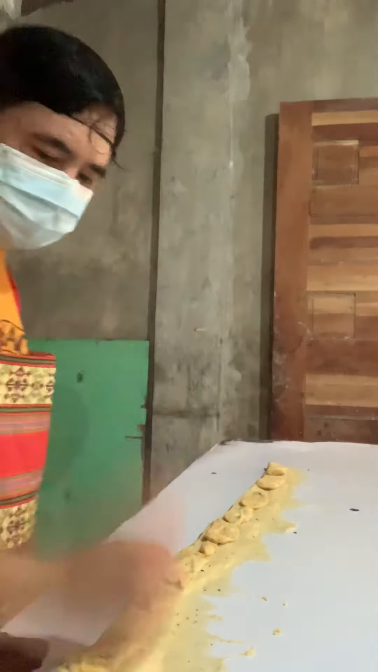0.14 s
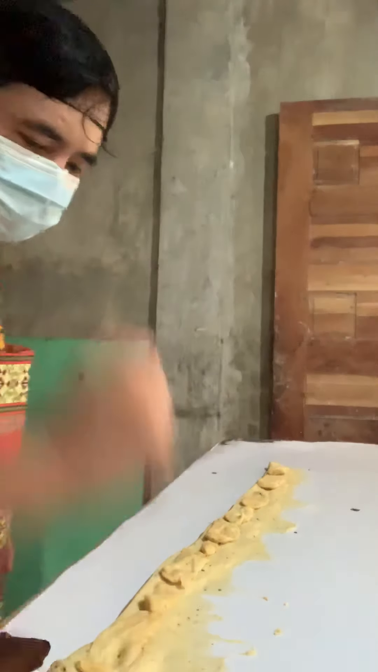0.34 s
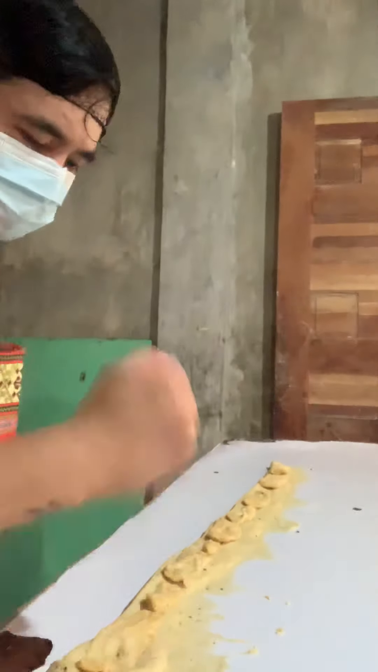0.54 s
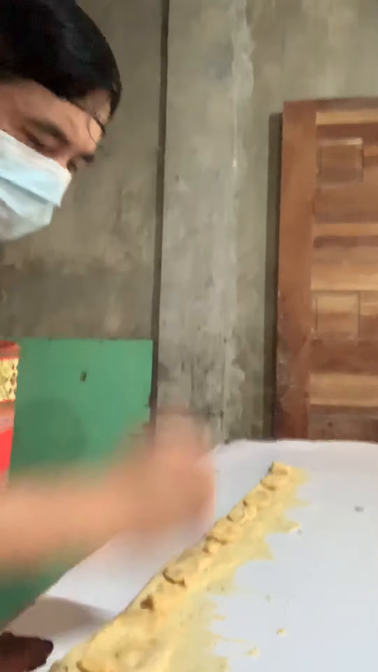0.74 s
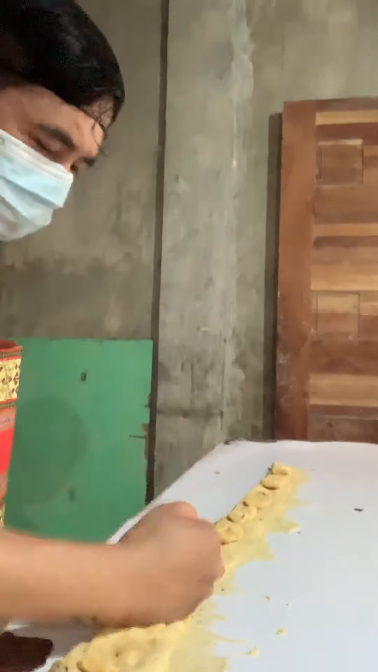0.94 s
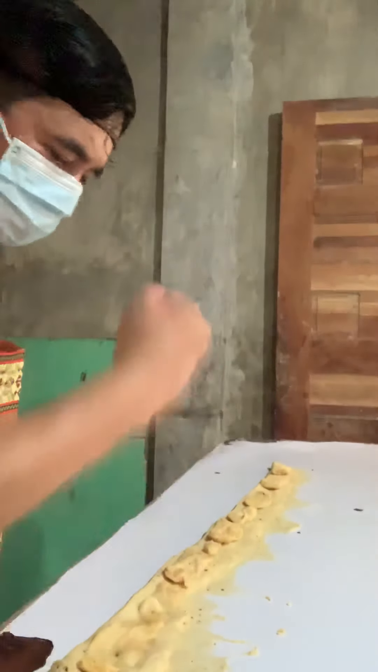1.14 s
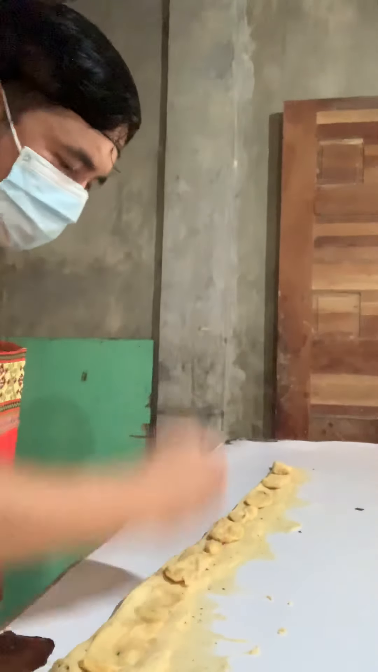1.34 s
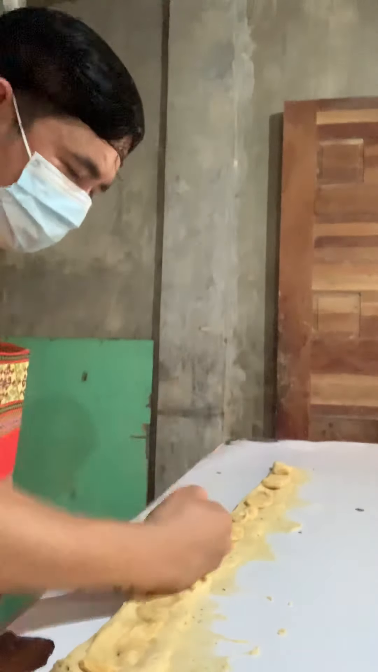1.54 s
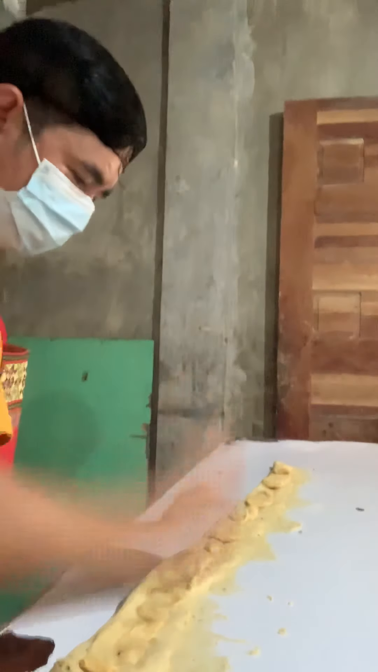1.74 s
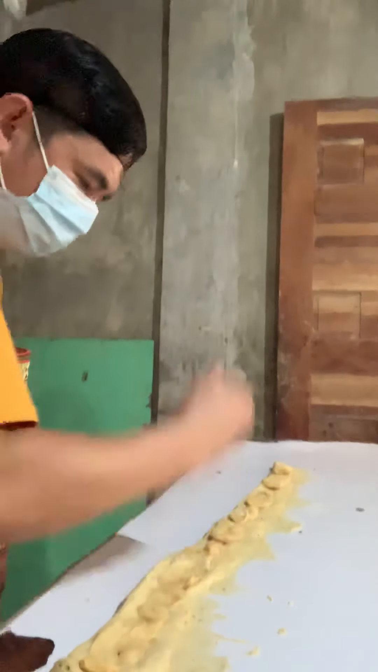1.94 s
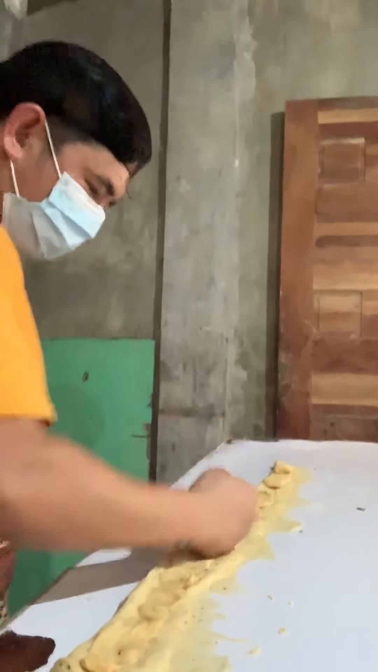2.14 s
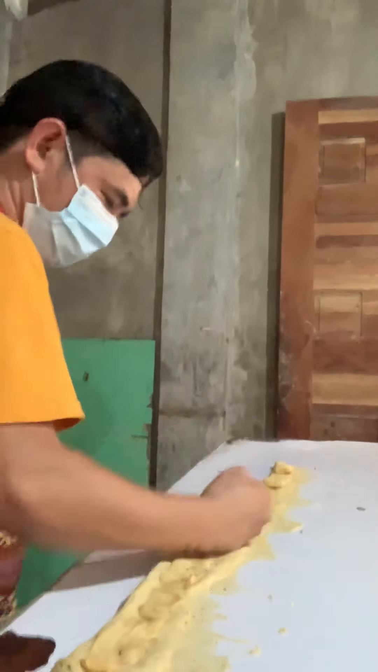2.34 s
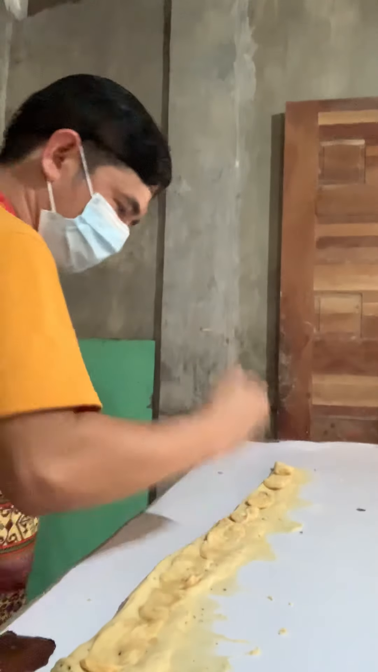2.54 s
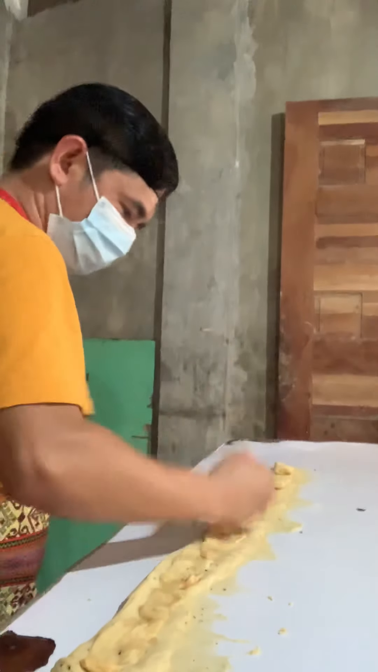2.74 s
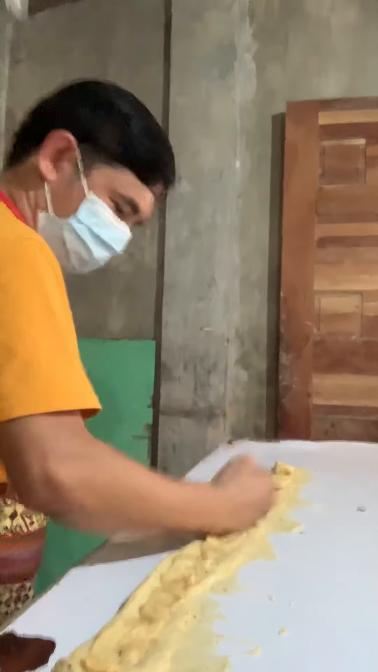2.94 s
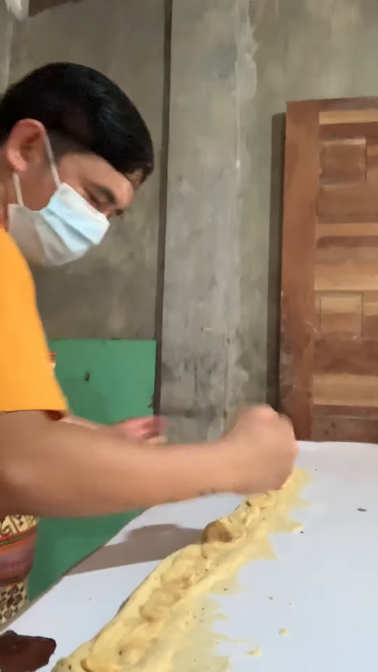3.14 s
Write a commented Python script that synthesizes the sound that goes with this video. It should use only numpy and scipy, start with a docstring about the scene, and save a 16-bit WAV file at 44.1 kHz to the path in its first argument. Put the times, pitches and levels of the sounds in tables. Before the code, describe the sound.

Rapid heavy thumps of a fist into dough, table top booming and chattering in a bare room

```python
"""First comes a faint steady hiss and the fading tail of a swish, with more swishes in the first half. Then a
fist pounds dough on a large sheet-covered table, close to a phone in a bare concrete room. Each blow is a short
low wave for the flexing table top, with decaying sines as its frame rumbles. Bursts of noise make smacks on the
dough, tiny impacts make the loose sheet chatter, single rings make knocks. Random taps that die away make the
room; two microphone ports pick everything up."""
import sys
import numpy as np
from scipy import signal
from scipy.fft import rfft, irfft, next_fast_len
from scipy.io import wavfile
from scipy.ndimage import uniform_filter1d

SR = 44100
rng = np.random.default_rng(int(sys.argv[2]) if len(sys.argv) > 2 else 0)


def put_to_file(sound):
    """Save the sound as 16-bit audio at rate SR, in the file named by the first command-line argument."""
    columns = np.atleast_2d(sound).T  # one column per channel
    safe = np.clip(columns, -1, 1)
    whole_steps = np.round(safe * 32767)
    wavfile.write(sys.argv[1], SR, whole_steps.astype(np.int16))


N = 145530  # samples, 3.3 s


def amp(db):
    """Turns dB into a plain multiplier."""
    return 10 ** (np.asarray(db) / 20)


def even(x):
    """Scales a sound to an average (RMS) level of 1."""
    return x / np.sqrt(np.mean(x ** 2) + 1e-20)


def read(points, hz):
    """Reads a curve between its points, along a logarithmic pitch scale."""
    f, v = np.transpose(points)
    return np.interp(np.log(hz + 1), np.log(f + 1), v)


def colour(x, points):
    """Makes each pitch louder or softer by a curve of (f/Hz, level/dB)."""
    n = next_fast_len(x.shape[-1] + 2048)
    gain = amp(read(points, np.fft.rfftfreq(n, 1 / SR)))
    return irfft(rfft(x, n) * gain, n)[..., :x.shape[-1]]


def add(mix, s, sound):
    """Adds a sound into the mix from time s, in seconds."""
    part = mix[..., round(s * SR):][..., :sound.shape[-1]]
    part += sound[..., :part.shape[-1]]


def ring(modes, length, turn):
    """Adds up fading sines, as a struck body rings; each starts at its own phase in turns."""
    t = np.arange(0, length, 1 / SR)
    out = 0
    for (hz, db, t60), start in zip(modes, turn):
        out = out + amp(db - 60 * t / t60) * np.sin(2 * np.pi * (hz * t + start))
    return out


HUSH_HZ = 15800  # hiss drops away sharply above this


def hiss(points):
    """Makes two unrelated noises of one colour, together at an RMS level of 1."""
    top_end = [(HUSH_HZ, points[-1][1] - 3), (HUSH_HZ + 200, -90)]
    return even(colour(rng.standard_normal((2, N)), points + top_end))


# colour of the steady background hiss: f/Hz, level/dB
AIR_COLOUR = [(25, -5), (80, 2.5), (250, -7), (600, -12), (1500, -17.5), (7000, -34.5), (12000, -37.5)]
AIR_DB = -36.5


def air():
    """A steady hiss, unrelated in its two channels, lies under everything."""
    return amp(AIR_DB) * hiss(AIR_COLOUR)


# swishes: start t/s, level/dB, low body level/dB, hold length/s
SWISH_TIMES = [(-.2, -29, -26.5, 0.041), (0.049, -33, -44, 0.032), (0.335, -31, -33, 0.027),
               (0.615, -32.5, -37.5, 0.023), (0.906, -33.5, -37.5, 0.046), (1.171, -34.5, -35, 0.098),
               (1.473, -29.5, -30.5, 0.019), (1.789, -32.5, -37.5, 0.01)]
# colour of the swish hiss: f/Hz, level/dB
SWISH_COLOUR = [(700, -13), (1500, 1.5), (3000, -4), (6000, -8.5), (12000, -13.5)]
SWISH_RISE_S, SWISH_T60 = 0.021, 0.77  # swell; seconds for the basic shape to fall 60 dB
TREBLE_FADE = 0.28  # the treble falls this much faster, as a fraction
SWISH_PATCH_DB = 3  # typical size of the patches


def swishes():
    """Patchy hiss swells, holds and fades; treble dies first, a low body fades at half the dB rate."""
    level, top, low = np.zeros((3, N))
    for s, db, body_db, length in SWISH_TIMES:
        t = np.maximum(np.arange(N) / SR - s, 0)
        swell = np.sin(np.pi / 2 * np.minimum(t / SWISH_RISE_S, 1)) ** 2
        shape = swell * amp(-60 * np.maximum(t - length, 0) / SWISH_T60)
        level += amp(db) * shape
        top += amp(db) * shape ** (1 + TREBLE_FADE)
        low += amp(body_db) * np.sqrt(shape)
    # smoothed random levels make patches in pitch and time
    z = signal.stft(hiss(SWISH_COLOUR))[2]
    patches = uniform_filter1d(rng.standard_normal(z.shape[1:]), size=12, axis=0)
    patches = even(uniform_filter1d(patches, size=8, axis=1))
    z = z * amp(SWISH_PATCH_DB * patches)
    under = np.arange(z.shape[1])[:, None] < 50  # below about 8.6 kHz
    dull, bright = (signal.istft(z * half)[1][:, :N] for half in (under, ~under))
    flutter = amp(2.7 * even(uniform_filter1d(rng.standard_normal(N), 500)))
    body = hiss([(150, -35), (400, -5.5), (750, -11), (1200, -15.5), (3000, -52)])
    return level * dull + top * bright + flutter * low * body


# blows, played by thumps and chatter:
# deepest flex t/s, thump level/dB, chatter level/dB, chatter length/s
BLOW_TIMES = [(0.216, -4, -15, 0.049), (0.4604, -2, -11.5, 0.045), (0.689, -2.5, -11.5, 0.055),
              (0.9653, -1.5, -12.5, 0.061), (1.2797, -1, -14.5, 0.068), (1.5678, -1.5, -15, 0.045),
              (1.8254, -5, -12.5, 0.043), (2.1255, -3, -13.5, 0.053), (2.399, -4, -12.5, 0.046),
              (2.669, -4, -15, 0.042), (2.968, -5, -14, 0.03)]
# ringing tones of the table frame: f/Hz, level/dB, time to fall 60 dB/s
FRAME_TONES = [(32.34, 3, 0.54), (60.6, -10, 0.44), (82.2, -0.5, 0.35), (123.8, -7.5, 0.41),
               (174.8, -4, 0.23)]
FLEX_HZ = 84.7
FLEX_WIDTH, FLEX_SKEW = 0.62, .12  # envelope width in cycles; lean towards the rebound in cycles
FLEX_SQUARE_PER_S = 0.11  # third harmonic steepens the flex more as the fist moves along the table
RUMBLE_DB = -15  # next to the thump


def thumps():
    """The table top bulges up, down and up again, then its frame rumbles on."""
    out, t = np.zeros(N), np.arange(-.03, .03, 1 / SR)
    turns = .5 + 0.23 * rng.standard_normal((len(BLOW_TIMES), len(FRAME_TONES)))
    envelope = np.exp(-((t * FLEX_HZ - FLEX_SKEW) / FLEX_WIDTH) ** 2)
    for (s, db, _, _), turn in zip(BLOW_TIMES, turns):
        third = FLEX_SQUARE_PER_S * s * np.cos(6 * np.pi * FLEX_HZ * t)
        flex = -(np.cos(2 * np.pi * FLEX_HZ * t) - third) * envelope
        add(out, s - .03, amp(db) * flex)
        rumble = ring(FRAME_TONES, .9, turn)
        rise = np.minimum(np.arange(len(rumble)) / (0.0029 * SR), 1)
        add(out, s, amp(db + RUMBLE_DB) * rumble * rise)
    return out


# smacks of skin on dough: t/s, level/dB, treble at 12 kHz/dB
SMACK_TIMES = [(0.2037, -14.5, 6.5), (0.4491, -1.5, 2), (0.719, -22, -29), (0.9943, -14.5, -29),
               (1.27, -13.5, 9), (1.3111, -21.5, -9.5), (1.556, -22, 7), (1.5682, -7.5, -9),
               (1.8095, -10, -21), (2.1144, -11, -1), (2.399, -12, -4.5), (2.6538, -13, -1.5),
               (2.953, -18.5, 9.5)]
SMACK_S = 0.00034  # time to the peak


def smacks():
    """Knuckles on dough crack: noise that peaks at once and dies, each with its own treble."""
    out, u = np.zeros((2, N)), np.arange(800) / SR / SMACK_S
    burst = u * np.exp(1 - u)
    noises = rng.standard_normal((len(SMACK_TIMES), 2, 800))
    for (s, db, bright_db), noise in zip(SMACK_TIMES, noises):
        tint = [(600, -3.5), (2000, 2.5), (5500, 4.0), (12000, bright_db), (16500, bright_db - 21)]
        # mostly shared by both ports, a little diffuse
        add(out, s, amp(db) * colour(noise * [[1], [.3]] * burst, tint))
    return out


# ringing tones of the loose sheet: f/Hz, level/dB, time to fall 60 dB/s
SHEET_TONES = [(216, -7, 0.016), (337, -3, 0.016), (524, 3.5, 0.015), (705, -5, 0.034), (837.6, 1.5, 0.024),
               (995, -5, 0.034), (1166, -27.5, 0.029)]
CHATTER_PER_S, CHATTER_SPREAD_DB = 700, 2  # impacts a second; dB for each unit of a random draw
CHATTER_T60, CHATTER_SAG_DB = 0.1, 0.5  # seconds to fall 60 dB once it ends; slow drop before that
# the chatter dips while the fist rests in the dough: delay after deepest flex, width, depth
LULL_S, LULL_WIDTH_S, LULL_DB = 0.012, 0.0061, -2.5
CHATTER_FIZZ_DB, FIZZ_T60 = -16, 0.77  # next to the chatter; seconds to fall 60 dB


def chatter():
    """Many small impacts after each blow ring the loose sheet; a fizz of noise dies away in the room."""
    level, fizz, t = np.zeros(N), np.zeros(N), np.arange(0, .4, 1 / SR)
    rise = np.minimum(t / 0.006, 1)
    lull = LULL_DB * np.exp(-((t - .01 - LULL_S) / LULL_WIDTH_S) ** 2)
    for s, _, db, length in BLOW_TIMES:
        fall = 60 * np.maximum(t - length, 0) / CHATTER_T60
        sag = CHATTER_SAG_DB * np.minimum(t / length, 1)
        add(level, s - .01, rise * amp(db - fall - sag + lull))
        add(fizz, s - .012, rise * amp(db + CHATTER_FIZZ_DB - 60 * t / FIZZ_T60))
    size = amp(CHATTER_SPREAD_DB * np.minimum(rng.exponential(1, N), 4))
    impacts = size * (rng.random(N) < CHATTER_PER_S / SR)
    # each impact rings one tone of the sheet, picked at random
    spot, soft = rng.integers(0, len(SHEET_TONES), N), np.hanning(30)
    body = np.zeros(N)
    for k, tone in enumerate(SHEET_TONES):
        strike = np.convolve(ring([tone], .08, [0]), soft)
        body += signal.oaconvolve(impacts * (spot == k), strike)[:N]
    return level * even(body), fizz * hiss([(1200, -1), (4000, -12), (12000, -23)])


# knocks of the loose sheet bouncing on the table: t/s, level/dB, f/Hz
KNOCK_TIMES = [(0.214, -9, 553), (0.244, -9, 842), (.342, -18.5, 721), (0.369, -18.5, 680),
               (0.477, -6.5, 632), (0.49, -6, 507), (0.687, -16.5, 826), (0.706, -3.5, 740),
               (0.719, -7.5, 673), (0.998, -2, 724), (1.199, -17, 610), (1.297, -14, 716),
               (1.313, -3.5, 751), (1.344, -14, 759), (1.572, -16, 458), (1.598, -7, 634), (1.822, -6, 833),
               (1.844, -8.5, 533), (2.138, -7.5, 670), (2.408, -11, 710), (2.435, -11.5, 729),
               (2.667, -7.5, 839), (2.691, -9.5, 815), (2.722, -15.5, 785), (2.968, -9, 760),
               (3.091, -24.5, 735)]
# colour of the slap of noise: f/Hz, level/dB
SLAP_COLOUR = [(900, -8), (1800, 0), (5000, -12.5), (12000, -12.5)]
KNOCK_T60 = 0.051  # seconds to fall 60 dB
PUSH_S, PUSH_DB, PUSH_DB_PER_S = 0.001854, -4, 1.5  # time scale; level next to the knock, and its growth
SLAP_DB, SLAP_S = -20, 0.0027  # next to the knock; time to the peak


def knocks():
    """Larger single impacts ring the loose sheet briefly, over a low downward push and under a slap of noise."""
    out, slap, t = np.zeros(N), np.zeros(N), np.arange(0, .05, 1 / SR)
    u = t / PUSH_S - 2
    push = (2 * u * u - 1) * np.exp(-u * u)
    rise = 1 - np.exp(-t / 0.00089)
    for s, db, hz in KNOCK_TIMES:
        tone = np.sin(2 * np.pi * hz * t) * rise * amp(db - 60 * t / KNOCK_T60)
        add(out, s - .001, tone + amp(db + PUSH_DB + PUSH_DB_PER_S * s) * push)
        add(slap, s - .001, amp(db + SLAP_DB) * t / SLAP_S * np.exp(1 - t / SLAP_S))
    return out, slap * hiss(SLAP_COLOUR)


# how long the room rings: f/Hz, time to fall 60 dB/s
ROOM_FADE = [(60, 0.59), (4000, 0.51)]
# how strongly the room answers: f/Hz, level/dB
ROOM_COLOUR = [(120, -6), (400, -7.5), (3000, -24.5)]


def room(x):
    """Bare walls echo as sparse taps of random sign, each band dying at its own speed."""
    taps = np.zeros((2, SR // 2))
    at = np.arange(200, SR // 2 - 20, 20)
    at = at + rng.integers(0, 20, (2, len(at)))
    np.put_along_axis(taps, at, rng.choice([-1., 1.], at.shape), 1)
    hz, t, z = signal.stft(taps, SR, nperseg=512)
    fade = amp(-60 * t / read(ROOM_FADE, hz)[:, None])
    fade = fade / np.linalg.norm(fade, axis=1)[:, None]  # same energy in each band
    tail = signal.istft(z * fade, SR, nperseg=512)[1]
    tail = tail / np.linalg.norm(tail[0])
    return colour(signal.fftconvolve(x[None], tail, axes=1)[:, :N], ROOM_COLOUR)


def scene():
    """Channel 0 is what both ports share; channel 1 is diffuse sound that they do not."""
    background = air() + swishes()
    thump, smack = thumps(), smacks()
    (body, fizz), (knock, slap) = chatter(), knocks()
    near = thump + body + knock
    return near * [[1], [0]] + room(near) + smack + slap + fizz + background


# how alike the two microphone ports are: f/Hz, likeness from 0 to 1
PORT_LIKENESS = [(90, 1), (250, 0.79), (600, 0.5), (1100, 0.09), (2000, 0.65), (3200, 0.035), (4300, 0.083),
                 (7200, 1), (10900, 0.99), (13000, 0.39), (14900, 0.8)]
# how far the left port leads the right: f/Hz, phase/radians
PORT_LEAD = [(150, 0), (1000, -.4), (2400, -2.0), (4000, -4.6), (7100, -np.pi), (11300, -np.pi),
             (14500, -.1)]
LEFT_DB, CEILING, EDGE_HZ = -.5, 1.0, 16400  # left port level; soft peak limit; upper band edge


def record(dry):
    """Two ports agree and shift in phase by pitch; a soft ceiling holds peaks, then treble is cut."""
    n = next_fast_len(N + 4096)
    hz = np.fft.rfftfreq(n, 1 / SR)
    shared, diffuse = rfft(dry, n) * np.minimum(hz / 20, 1) ** 2  # weaker below 20 Hz
    mix = np.arccos(np.clip(read(PORT_LIKENESS, hz), 0, 1)) / 2
    turn = np.exp(.5j * read(PORT_LEAD, hz))
    left = (np.cos(mix) * shared + np.sin(mix) * diffuse) * turn
    right = (np.cos(mix) * shared - np.sin(mix) * diffuse) / turn
    ports = irfft(np.array([left, right]), n)[:, :N]
    ports[0] *= amp(LEFT_DB)
    held = ports / (1 + abs(ports / CEILING) ** 8) ** (1 / 8)
    low_pass = signal.firwin(511, EDGE_HZ, window=("kaiser", 9), fs=SR)
    return signal.oaconvolve(held, low_pass[None], "same")


dry = scene()
out = record(dry)
put_to_file(out)
```